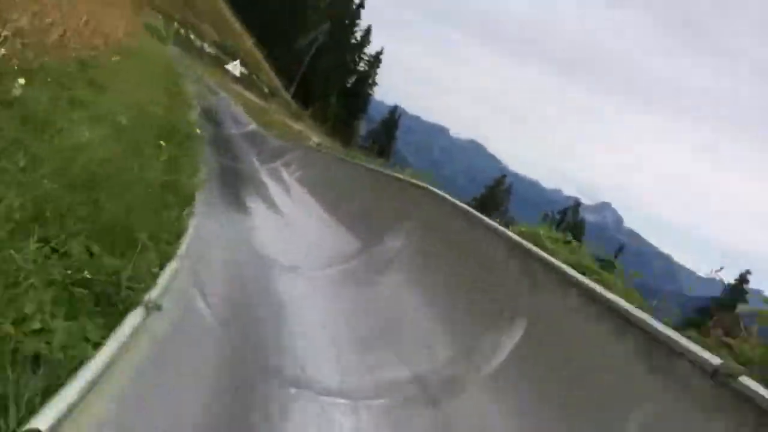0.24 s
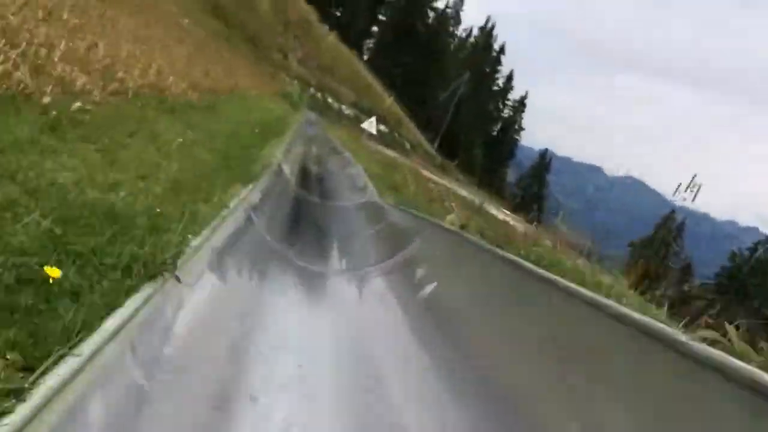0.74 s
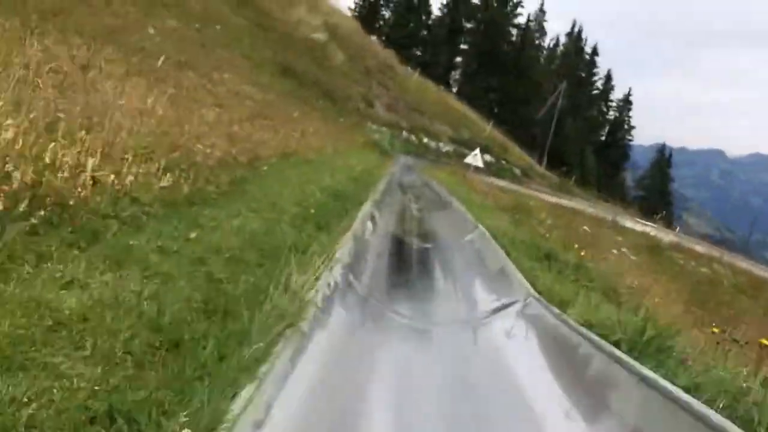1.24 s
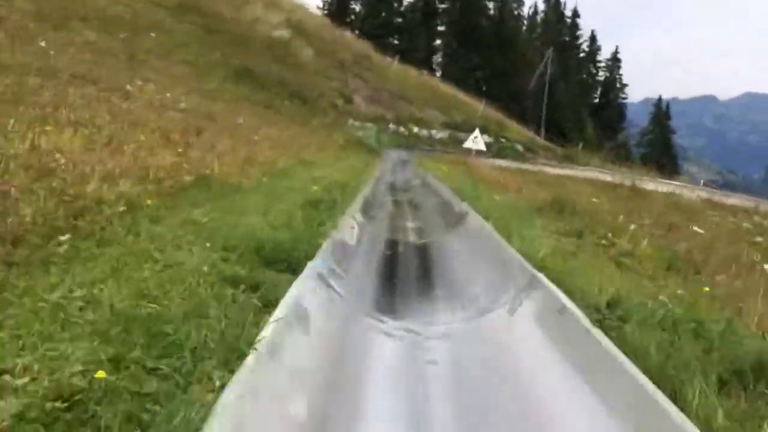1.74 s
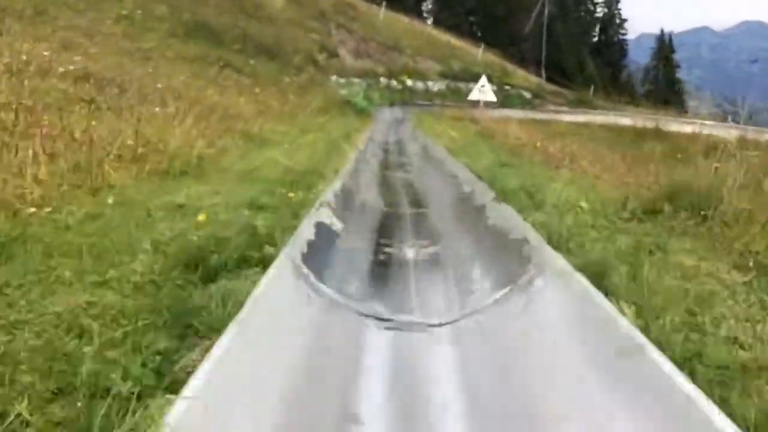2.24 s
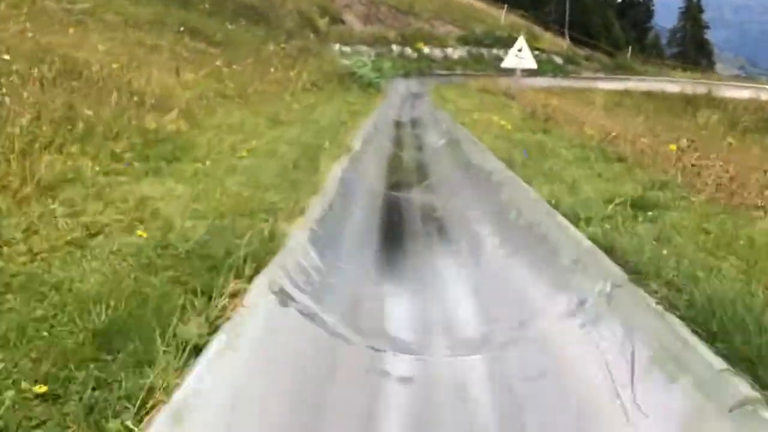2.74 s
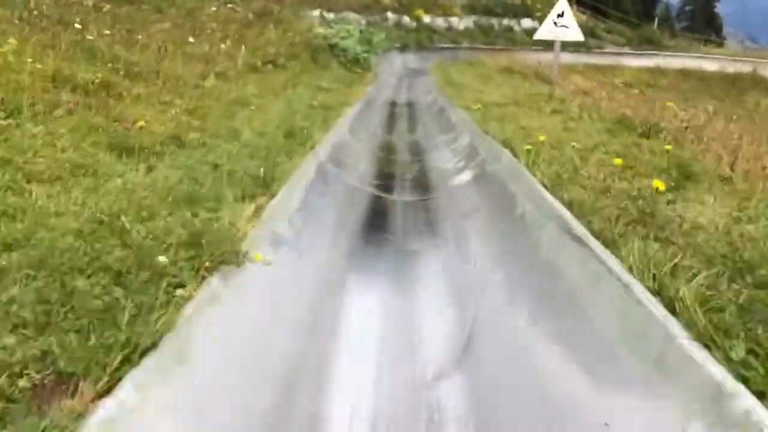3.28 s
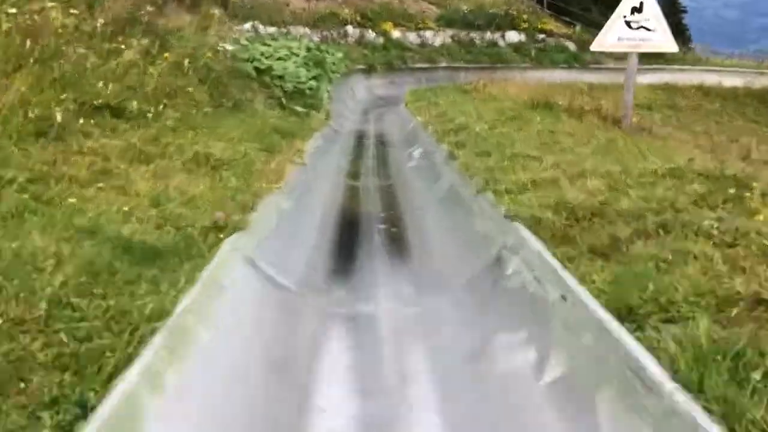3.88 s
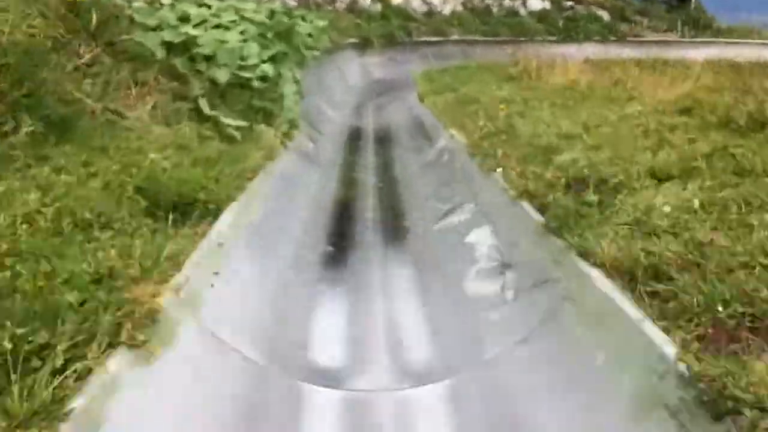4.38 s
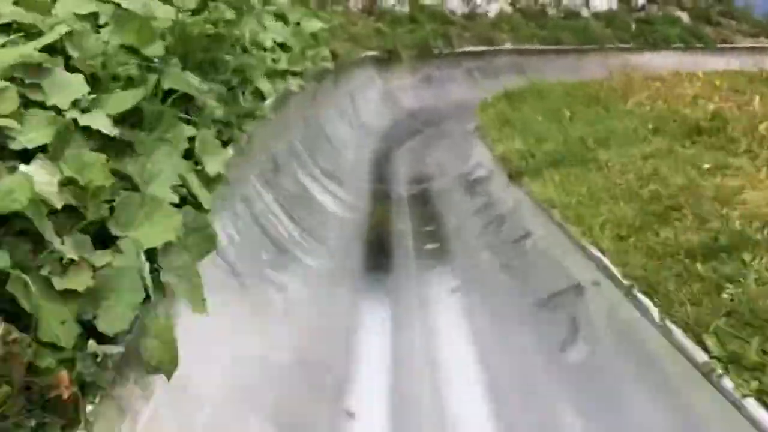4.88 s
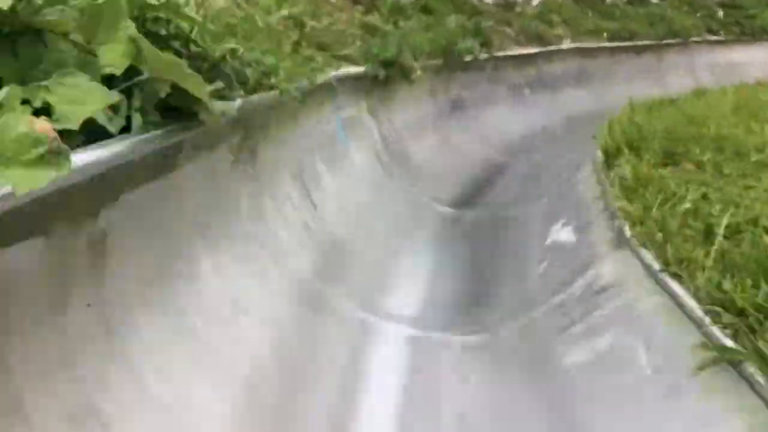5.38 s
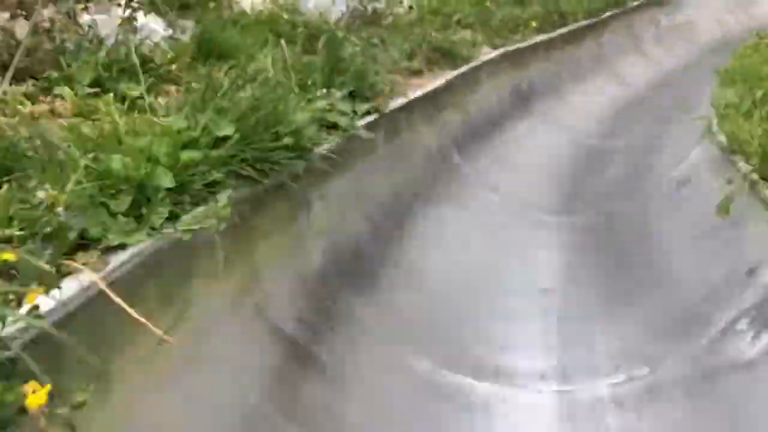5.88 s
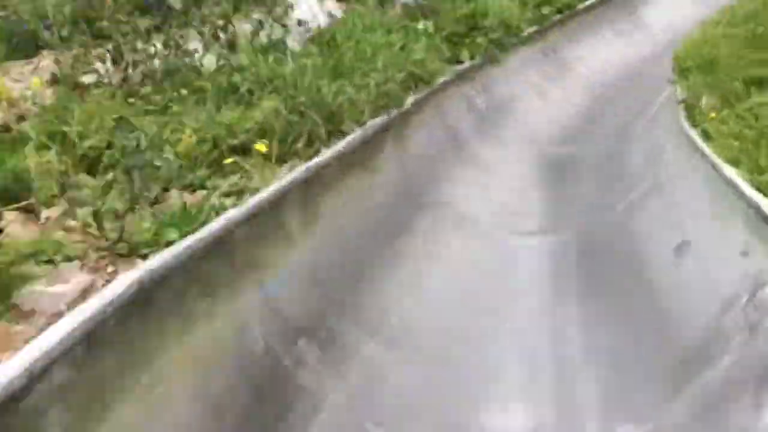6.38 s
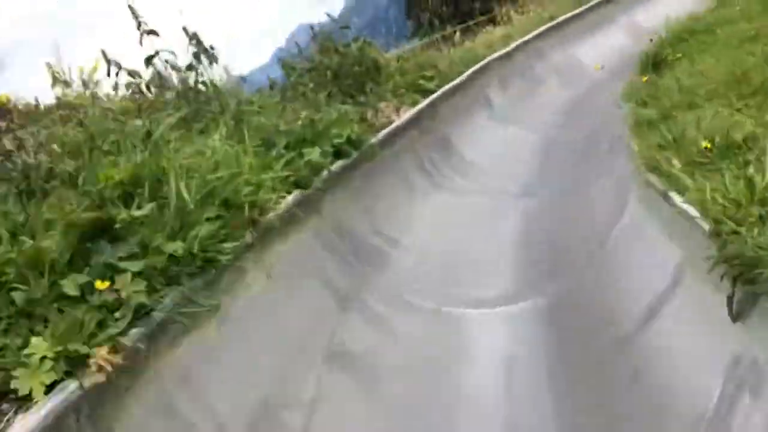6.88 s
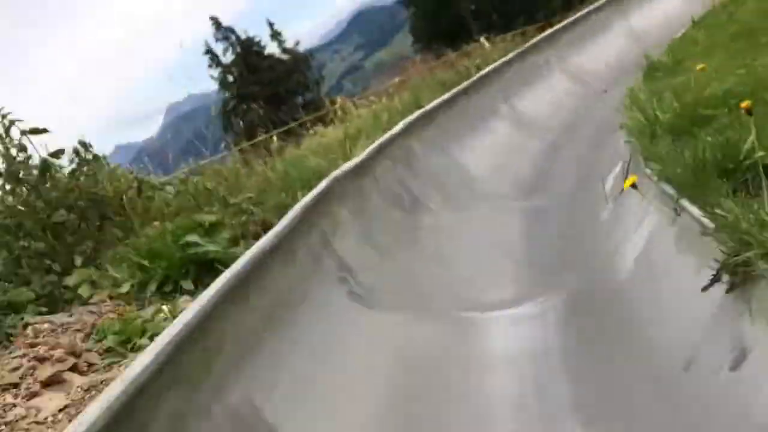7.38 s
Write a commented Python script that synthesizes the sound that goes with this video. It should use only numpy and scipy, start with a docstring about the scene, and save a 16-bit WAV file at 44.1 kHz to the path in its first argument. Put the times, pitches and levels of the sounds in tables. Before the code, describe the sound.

A plastic sled runs down a sheet-metal trough on a grassy hillside, heard from on board, with a continuous low roar, fine grinding and trembling rumble beneath. In the first second, quick hollow booms, clacks, light scuffs and a few metallic clonks tumble together. From about 1 to 2.2 seconds the knocks are sparser, with a pair of strong booms near 1.4. At 2.3 a hard double blow starts the roughest stretch: deep thuds, booming shell, clattering hits and gritty skids crowd together until about 4.5, with short whirrs rising near 2.5, 3.3, 3.7 and 4.2. Heavy thumps continue around 4.7 and 4.8, then thin out. After roughly 5.4 the runners hiss more strongly through a bend, with isolated knocks near 5.9, 6.1 and 6.7, and a lighter cluster around 7.4. The sliding continues to the end.

```python
"""A plastic sled runs fast down a sheet-metal trough on a hillside, heard from on board.
Each jolt makes the sled's shell boom and the trough thud and sag, with a clack; some blows clonk.
These are ringing tones and bursts of tiny contacts. Runners scuff the metal, and whirrs rise after hard scuffs.
Underneath, filtered noise and grit make the runners' roar and grind, and a hiss as the sled leans into a bend."""
import sys
import numpy as np
from scipy import signal
from scipy.fft import rfft, irfft
from scipy.io import wavfile

SR = 44100
rng = np.random.default_rng(int(sys.argv[2]) if len(sys.argv) > 2 else 0)


def wav_out(sig):
    """Save sig, one row per channel (or a flat mono array), as 16-bit PCM at SR to the path in sys.argv[1]."""
    wavfile.write(sys.argv[1], SR, np.round(np.clip(np.atleast_2d(sig).T, -1, 1) * 32767).astype(np.int16))


N = 336483  # length in samples


def from_db(db):
    """Turn decibels into a gain."""
    return 10 ** (np.asarray(db) / 20)


def rms_one(x):
    """Scale a sound to an rms (average strength) of 1."""
    return x / np.sqrt(np.mean(x ** 2) + 1e-20)


def level_curve(rows):
    """Draw straight lines between (time, level) points, giving a level for every sample."""
    times, levels = np.transpose(rows)
    return np.interp(np.arange(N) / SR, times, levels)


def add(out, s, sound):
    """Mix a sound in at time s."""
    start = int(np.clip(round(s * SR), 0, N - 1))
    out[start:start + len(sound)] += sound[:N - start]


def drift(rate_hz):
    """Wander slowly at random around 0, with a spread of 1."""
    # worked out at every 20th sample; the first 4000 values let the filter settle
    r = np.exp(-40 * np.pi * rate_hz / SR)
    noise = rng.standard_normal(N // 20 + 4002)
    slow = signal.lfilter([1], [1, -2 * r, r * r], noise)[4000:]
    return np.interp(np.arange(N) / 20, np.arange(len(slow)), rms_one(slow))


def low_pass(x, hz):
    """Take away the sound above a pitch, gently."""
    return signal.sosfilt(signal.butter(2, hz, "low", fs=SR, output="sos"), x)


def colour(x, spectrum, size=2048):
    """Filter a sound to a spectrum without pre-echo (minimum phase); white noise keeps its power."""
    hz, db = np.transpose(spectrum)
    grid = np.maximum(np.arange(size // 2 + 1) * SR / size, 1)
    gain = from_db(np.interp(np.log(grid), np.log(hz), db))
    cepstrum = irfft(np.log(gain))
    # folding the cepstrum onto positive times puts the energy as early as possible
    folded = 2 * cepstrum[:size // 2] * (np.arange(size // 2) > 0)
    response = irfft(np.exp(rfft(folded, size)))
    return signal.fftconvolve(x, response / np.linalg.norm(response))[:len(x)]


def ring(clicks, hz, t60):
    """A unit click starts a sine of height 1 that falls by 60 dB in t60 seconds."""
    r, w = from_db(-60 / (t60 * SR)), 2 * np.pi * hz / SR
    return signal.lfilter([0, np.sin(w)], [1, -2 * r * np.cos(w), r * r], clicks + 1e-18)


def resonate(x, hz, t60):
    """Ring a mode (one natural tone) with noise-like input, keeping its power."""
    return ring(x, hz, t60) * np.sqrt(2 * (1 - from_db(-120 / (t60 * SR))))


def grains(per_s, spread_db, size=N):
    """Tiny contacts at random moments, uneven in size; rms 1."""
    sizes = from_db(spread_db * np.minimum(rng.exponential(1, size), 4))
    sizes = sizes * rng.choice([-1, 1], size)
    return rms_one(sizes * (rng.random(size) < per_s / SR))


def burst(rise_s, length_s):
    """The pressure of a contact: a quick rise, a short hold, then it lets go; top 1."""
    t = np.arange(SR // 3) / SR
    shape = (1 - np.exp(-t / rise_s)) * from_db(-20 * (t / length_s) ** 1.4)
    return shape / shape.max()


def chatter(envelope, per_s, spread_db):
    """A run of tiny contacts under an envelope, with the envelope's energy."""
    force = envelope * grains(per_s, spread_db, size=len(envelope))
    return force * np.linalg.norm(envelope) / (np.linalg.norm(force) + 1e-12)


def at_spot(spectrum, ripple_db, tilt_db=0, count=110):
    """Each spot of the track adds narrow peaks and dips of its own to the common spectrum."""
    hz, db = np.transpose(spectrum)
    octave = np.linspace(np.log2(hz[0]), np.log2(hz[-1]), count)
    level = np.interp(octave, np.log2(hz), db) + tilt_db * octave
    return np.transpose([2 ** octave, level + ripple_db * rng.standard_normal(count)])


def knocks(table, modes, swell_s, soft_s, overtone_db):
    """Each blow feeds a panel's modes, which swell for a few cycles and die away."""
    out, t = np.zeros(N), np.arange(SR // 5) / SR
    ratio, mode_db, life = np.transpose(modes)[:, :, None]
    age = t / (swell_s * life)
    soft_start = 1 - np.exp(-(t / soft_s) ** 2)
    envelope = age * np.exp(1 - age) * soft_start
    chance = rng.standard_normal((len(table), 3, len(modes), 1))
    # only the modes after the first vary in strength and tuning
    side_mode = np.arange(len(modes))[:, None] > 0
    for (s, db, hz), (strength, detune, phase) in zip(table, chance):
        gain = from_db(mode_db + side_mode * (overtone_db + 2.0 * strength))
        pitch = hz * ratio * (1 + 0.037 * detune * side_mode)
        tones = np.sin(2 * np.pi * pitch * t + np.pi * phase)
        add(out, s, from_db(db) * np.sum(gain * envelope * tones, axis=0))
    return out


def shaking(blows, t60):
    """How hard the sled still trembles after its blows: their power, dying away."""
    r = from_db(-120 / (t60 * SR))
    return np.sqrt(signal.lfilter([1 - r], [1, -r], blows ** 2 + 1e-18))


# how bumpy the track is, as a level before the mix: (time [s], level [dB])
BUMPINESS = [(0, -19), (.08, -42.5), (.25, -32.5), (.9, -32.5), (1.3, -49.5), (1.6, -40.5), (2.2, -37),
             (2.4, -34.5), (3.05, -37.5), (3.3, -29.5), (4.3, -33.5), (4.57, -35), (6.05, -38.5),
             (6.35, -32.5), (6.53, -37.5), (6.88, -31), (7.0, -41.5), (7.1, -30), (7.47, -38.5),
             (7.63, -30)]


def trembling(blows, load):
    """Bumps shake the shell, and every blow leaves it trembling for a moment."""
    from_bumps = from_db(level_curve(BUMPINESS) + 2.5 + 0.23 * load)
    return np.hypot(from_bumps, from_db(-7.0) * shaking(blows, t60=0.17))


# the natural tones of the shell: (pitch [Hz], relative level [dB], time to fall by 60 dB [s])
SHELL_TONES = [(161, -8, 0.053), (250.6, -2, 0.12), (281.6, 4, 0.1), (326.7, -2.5, 0.071),
               (382.4, -4, 0.14), (465, -10, 0.071), (596, -17.5, 0.045)]


def rumble():
    """Small bumps strike all the shell's modes, each with a strength of its own; rms 1."""
    bumps = grains(per_s=65, spread_db=0.5)
    tones = np.zeros(N)
    for hz, db, t60 in SHELL_TONES:
        tones += from_db(db) * resonate(bumps * rng.standard_normal(N), hz, t60)
    return rms_one(tones)


# the tone colour of the low roar: (frequency [Hz], relative level [dB])
ROAR_COLOUR = [(22, -19), (55, 2), (105, 5), (160, -1.5), (230, -8), (400, -12), (1200, -60)]


def roar(grind_db, load):
    """The trough's low roar is deep noise that grows with the grinding and the load."""
    level_db = -35.0 + 0.38 * (grind_db + 51.0) + 0.79 * load + 2.0 * drift(9.1)
    return from_db(level_db) * colour(rng.standard_normal(N), ROAR_COLOUR, size=8192)


# the tone colour of the sled hitting metal, hopping or clacking: (frequency [Hz], relative level [dB])
CLACK_COLOUR = [(120, -33.5), (250, 5), (450, 18.5), (700, 11.5), (1000, 5.5), (1400, -1.5), (1900, -5),
                (2600, -16.5), (4000, -14), (8000, -20.5), (15000, -36.5)]


def ticks(tremble):
    """Small, soft hops on the metal, stronger while the shell trembles."""
    hops = low_pass(grains(per_s=90, spread_db=-1), 2500)
    return from_db(-14) * tremble * colour(hops, CLACK_COLOUR)


# how hard the runners grind on the sheets, before the mix: (time [s], level [dB])
GRIND_LEVEL = [(0, -46.5), (.7, -52.5), (1.05, -51), (1.7, -51), (1.87, -48), (2.2, -47.5), (2.55, -41.5),
               (2.7, -50), (3.25, -52), (3.34, -48), (3.48, -41), (3.62, -47.5), (3.82, -33.5), (4.0, -49),
               (4.26, -33), (4.4, -50), (5.14, -51.5), (5.22, -46), (5.42, -44.5), (5.8, -50), (5.88, -45),
               (6.02, -48), (6.3, -51.5), (6.4, -45), (6.56, -50), (6.8, -48), (7.0, -48.5), (7.1, -45.5),
               (7.22, -51), (7.63, -47.5)]


def grinding_level(scrape):
    """The runners grind harder on rough track and for a moment after a scuff."""
    drag = from_db(-5.5) * shaking(scrape, t60=0.14)
    track = from_db(level_curve(GRIND_LEVEL) - 1)
    return 10 * np.log10(track ** 2 + drag ** 2)


# the ringing of the trough's sheets: (pitch [Hz], relative level [dB], time to fall by 60 dB [s])
SHEET_TONES = [(586, -3, 0.014), (1605, 13, 0.011), (1782, 9.5, 0.027), (1850, -3, 0.13),
               (2050, 9.5, 0.032)]
# the tone colour of the grit itself: (frequency [Hz], relative level [dB])
GRIT_COLOUR = [(300, -9), (550, 4), (900, 17), (1250, 6.5), (1800, 7), (2500, -3.5), (3500, 10),
               (15000, -68)]
# the tone colour of the bright rasp: (frequency [Hz], relative level [dB])
RASP_COLOUR = [(1200, -8), (1900, 8), (3100, 7), (3500, -2), (4250, 5), (5500, 0), (15000, -10)]


def grinding(level_db):
    """Grit under the runners rings the sheets, whose tones come and go; harder grinding rasps more."""
    grit = grains(per_s=1900, spread_db=-2.0) * from_db(2.0 * drift(25))  # in coarse clumps
    tones = np.zeros(N)
    for hz, db, t60 in SHEET_TONES:
        tones += from_db(db + 3 * drift(12)) * resonate(grit, hz, t60)
    body = from_db(-2.0) * rms_one(low_pass(tones, 2600))
    body += from_db(-9.0) * colour(grit, GRIT_COLOUR)
    rasp_gain = from_db(-2.0 + 0.15 * (level_db + 24.5))
    rasp = rasp_gain * colour(grains(per_s=2200, spread_db=3.0), RASP_COLOUR)
    return from_db(level_db) * (body + rasp)


# smooth sliding, with a brief swell at 3.85 s and a long strong stretch in the last bend:
# (time [s], level [dB])
SLIDE_LEVEL = [(0, -57), (.5, -48), (1.0, -56.5), (1.25, -53.5), (1.7, -54), (1.86, -49.5), (2.3, -57.5),
               (2.66, -55), (3.64, -58.5), (3.85, -43.5), (4.4, -59), (4.97, -59.5), (5.42, -45.5),
               (5.74, -52), (5.88, -44), (6.0, -45.5), (7.0, -45.5), (7.63, -48)]
# the tone colour of the hiss: (frequency [Hz], relative level [dB])
HISS_COLOUR = [(1200, 5), (2500, 3.5), (4200, 3), (5200, 4), (6400, 8.5), (8000, 6), (11000, 3), (15500, 0)]


def hiss(load):
    """Smoothly sliding runners hiss with a dense stream of tiny contacts."""
    contacts = grains(per_s=25000, spread_db=3.5)
    return from_db(level_curve(SLIDE_LEVEL) + load) * colour(contacts, HISS_COLOUR)


# a runner scuffs the metal, from a short tick to a long skid, before the mix:
# (time [s], level [dB], time for its pressure to fall about 20 dB [s], brightness [dB per octave])
SCUFF_EVENTS = [(.019, -37, 0.0064, 6), (.185, -35, 0.02, 4), (.225, -41.5, 0.04, -2),
                (.264, -38.5, .018, 5), (.323, -38, 0.014, 7), (.41, -35, 0.016, 3), (.487, -39, .014, 5),
                (.545, -41, .02, 2.5), (.666, -44, 0.046, 1), (.701, -26.5, 0.009, -9),
                (.733, -40, 0.015, 6), (.819, -35.5, 0.014, -1), (.917, -38.5, 0.023, 7),
                (1.453, -35.5, .028, 4), (2.307, -24, 0.014, 4), (2.328, -29.5, .035, 3),
                (2.384, -40.5, 0.049, 4.5), (2.454, -27, 0.0054, 0.5), (2.501, -32.5, 0.041, 2.5),
                (2.59, -35, 0.026, -4.5), (2.703, -34.5, 0.087, 3), (2.826, -41.5, 0.019, 0),
                (2.847, -31.5, 0.016, -1), (2.893, -36.5, 0.048, -1.5), (3.01, -45, .014, 2),
                (3.122, -31.5, .04, -3.5), (3.191, -39.5, 0.014, 0.5), (3.245, -36.5, 0.065, -5.5),
                (3.283, -35.5, 0.028, 4), (3.306, -25, 0.032, 4), (3.406, -33.5, 0.04, -4),
                (3.524, -35, 0.036, 2.5), (3.562, -34, 0.022, 3), (3.644, -25.5, 0.016, -11),
                (3.684, -29.5, 0.023, -9), (3.714, -27.5, 0.03, 4.5), (3.781, -39.5, 0.13, 9),
                (3.92, -32, 0.033, 2), (3.957, -35.5, .011, 4), (3.994, -34, 0.01, 3),
                (4.049, -30, 0.02, 0.5), (4.092, -25, 0.027, 5), (4.175, -27, 0.017, -0.5),
                (4.227, -39, .11, 3), (4.272, -31.5, 0.018, -3.5), (4.313, -32, 0.023, 4.5),
                (4.377, -42.5, .014, 1), (4.529, -41, 0.011, -9), (4.632, -33.5, 0.032, 1),
                (4.703, -38, 0.006, 9), (4.8, -49, 0.008, 7), (5.056, -45, 0.015, -1),
                (5.175, -37.5, .0076, 0.5), (5.528, -33.5, 0.01, 0), (5.895, -37, 0.019, -5),
                (6.117, -28, 0.022, -6), (6.353, -35, 0.027, -5), (6.433, -40, 0.011, -3),
                (7.148, -36, 0.041, 0.5), (7.377, -33.5, 0.022, 2.5), (7.54, -34.5, 0.014, -5.5),
                (7.619, -33.5, .013, 3)]
# the tone colour of a scuff: (frequency [Hz], relative level [dB])
SCUFF_COLOUR = [(700, -0.5), (1600, 9), (2600, 4.5), (4300, 8), (5500, 5.5), (6300, 6.5), (7500, 2),
                (9400, 3.5), (12000, -4.5), (15500, -8)]


def scuffs(hits):
    """A runner slaps the metal and skids on, gritty and uneven; every landing skids a little too."""
    # a landing's skid is 10 dB under its clack, 0.017 s long and dull (-6 dB per octave)
    skids = [(s, db - 10, 0.017, -6) for s, db in hits]
    out = np.zeros(N)
    for s, db, length_s, tilt_db in list(SCUFF_EVENTS) + skids:
        pressure = burst(rise_s=0.0014, length_s=length_s)
        force = from_db(db) * chatter(pressure, per_s=5000, spread_db=2.5)
        add(out, s, colour(force, at_spot(SCUFF_COLOUR, ripple_db=4.0, tilt_db=tilt_db)))
    stick_and_slip = from_db(2.2 * drift(145))
    return from_db(3.0) * out * stick_and_slip


# the sled hits a seam or dent, levels before the mix: (time [s], boom of the shell [dB],
# pitch of the boom [Hz], thud of the trough [dB], clack [dB])
JOLT_EVENTS = [(0.114, -20.5, 295, -14, -32.5), (.160, -10.5, 278.5, -22, -34), (.192, -15, 287, -28, -26),
               (0.208, -13.5, 289, -26, -40), (.349, -19, 309, -23, -33), (0.413, -17.5, 325, -24, -34),
               (0.464, -20, 305, -39, -34.5), (.588, -13.5, 292, -34, -31.5), (.826, -17.5, 287, -39, -29),
               (.866, -12, 292, -36, -33), (0.93, -22, 320, -16, -25.5), (1.057, -21.5, 318, -11.5, -32),
               (1.14, -27, 274, -12, -57), (1.224, -41, 295, -14, -50), (1.425, -13, 294, -18, -36),
               (1.446, -8.5, 287.7, -32, -33.5), (1.572, -26, 295, -16.5, -41.5),
               (1.858, -11.5, 285, -11, -36.5), (2.008, -24, 288, -20.5, -36),
               (2.284, -7.5, 275, -3.5, -27), (2.305, -12, 283.6, -15, -41), (2.323, -6.5, 293, -27, -33),
               (2.435, -15, 298, -10, -25.5), (2.456, -12, 300, -3, -23.5), (2.592, -24.5, 300, -14.5, -36),
               (2.712, -8, 329, -9, -28), (2.747, -15.5, 321, -17, -43), (2.848, -12, 319, -5, -25.5),
               (2.891, -20, 297, -9.5, -31.5), (2.997, -29, 297, -30, -35), (3.104, -10.5, 305, -6, -34),
               (3.122, -10.5, 337, -12, -25), (3.186, -19.5, 283, -21, -46), (3.264, -12, 305, -4.5, -24.5),
               (3.312, -13, 305, -17, -29), (3.505, -8.5, 309.4, -4.5, -34), (3.548, -14.5, 342, -7, -25.5),
               (3.644, -28, 298, -4, -23.5), (3.667, -20, 384, -15, -29.5), (3.715, -23, 300, -6.5, -28),
               (3.786, -21, 314, -8.5, -35), (3.907, -9.5, 326, -9.5, -30), (3.944, -17.5, 310, -7, -46),
               (4.035, -10, 307, -7.5, -25), (4.061, -10.5, 353, -5, -24), (4.097, -13.5, 352, -6.5, -30),
               (4.18, -16.5, 310, -8, -33), (4.296, -9, 356.3, -6, -28), (4.423, -16.5, 282, -5.5, -23.5),
               (4.46, -29, 294, -6.5, -38), (4.667, -7, 276.4, -4, -30.5), (4.707, -30, 288, -24, -35.5),
               (4.8, -20, 294, -3.5, -30), (4.854, -15, 294, -12, -37.5), (5.045, -20, 274, -10, -41),
               (5.515, -17, 321, -3, -35), (5.651, -23.5, 323.5, -9, -32), (5.874, -23, 316, -9.5, -35),
               (6.122, -11.5, 292, -43, -27.5), (6.443, -19, 291.5, -33, -38.5),
               (6.666, -14.5, 335.5, -17.5, -27), (6.902, -22.5, 299, -15.5, -32.5),
               (7.173, -17, 305, -30, -52), (7.308, -25, 298, -25, -35.5),
               (7.378, -16.5, 361, -15.5, -25.5), (7.403, -12.5, 292.4, -28, -35),
               (7.601, -18.5, 304, -17.5, -40.5)]
# the sheet under the sled, stiffer and slacker along the track: (time [s], pitch [Hz])
SHEET_PITCH_CURVE = [(.9, 151), (1.2, 124), (2.3, 173.4), (2.85, 146.4), (3.7, 142), (4.06, 162),
                     (4.42, 115.4), (5.05, 115.8), (5.5, 132.7), (7.6, 135.4)]
THUD_LEAD_S, BOOM_LAG_S = 0.00607, 0.00082  # the sheet gives way just before the hit, the shell answers after
THUD_SPREAD_OCTAVES = 0.024  # every spot of the track is tuned a little differently


def landings():
    """Split each jolt into a thud and a boom (time, level, pitch) and a clack (time, level)."""
    booms, thuds, hits = [], [], []
    spots = rng.standard_normal(len(JOLT_EVENTS))
    for (s, boom_db, boom_hz, thud_db, clack_db), spot in zip(JOLT_EVENTS, spots):
        sheet_hz = np.interp(s, *np.transpose(SHEET_PITCH_CURVE))
        booms.append((s + BOOM_LAG_S, boom_db, boom_hz))
        thuds.append((s - THUD_LEAD_S, thud_db, sheet_hz * 2 ** (THUD_SPREAD_OCTAVES * spot)))
        hits.append((s, clack_db))
    return booms, thuds, hits


# the natural tones of a knocked panel, sheet or shell:
# (multiple of its pitch, relative level [dB], life as a multiple of the swell time)
PANEL_TONES = [(1, 2, 0.61), (.74, -21, 2.74), (1.27, -16, 2.03), (1.58, -16.5, 0.77), (2.05, -32.5, 3.1)]


def sheet_thuds(thuds):
    """The struck metal sheet thuds: low tones with a sharp start and strong overtones."""
    return from_db(-6.5) * knocks(thuds, PANEL_TONES, swell_s=0.0086, soft_s=0.00043, overtone_db=9.0)


def sags(thuds):
    """The trough sags under each landing with a deep, short thump; a slack sheet gives more."""
    slack_hz, loss_per_octave = 113, 29  # reference pitch; dB lost per octave on stiffer sheets
    pushes = np.zeros(N)
    for s, db, hz in thuds:
        add(pushes, s, from_db([db - 6.5 + loss_per_octave * np.log2(slack_hz / hz)]))
    return ring(pushes, hz=73, t60=0.075)


def clacks(hits):
    """The sled lands on metal with one firm hit and chatters for an instant; heavier is duller."""
    out = np.zeros(N)
    for s, db in hits:
        pressure = burst(rise_s=0.00073, length_s=0.045)
        force = from_db(db) * chatter(pressure, per_s=2200, spread_db=0.5)
        firm_hit = signal.unit_impulse(len(force), int(0.00205 * SR))
        force = force + from_db(-10.5) * np.linalg.norm(force) * firm_hit
        tilt_db = 2.63 - 0.077 * (db + 32.5)  # brightness, dB per octave
        add(out, s, from_db(1.5) * colour(force, at_spot(CLACK_COLOUR, ripple_db=2.5, tilt_db=tilt_db)))
    return out


# a square blow makes a sheet of the trough clonk: (time [s], level [dB], pitch [Hz])
CLONK_EVENTS = [(.114, -19.5, 558), (.349, -19, 506), (.585, -22, 516), (.700, -21.5, 580),
                (.816, -17.5, 506), (.932, -30, 606), (1.055, -23, 682), (2.847, -29, 520),
                (4.053, -23, 553), (6.121, -28, 867), (6.667, -20, 490), (7.047, -29.5, 513)]
# the natural tones of a clonk:
# (multiple of its pitch, relative level [dB], life as a multiple of the swell time)
CLONK_TONES = [(1, 0.5, 0.81), (1.3, -3, 0.68), (1.7, -5.5, 0.75), (2.1, -8.5, 0.71), (2.9, -15, 1)]


def clonks():
    """A squarely struck sheet rings with a few short tones."""
    return knocks(CLONK_EVENTS, CLONK_TONES, swell_s=0.0047, soft_s=0.002, overtone_db=1)


def shell_booms(booms):
    """The plastic shell booms: its tones start softly, swell and die away."""
    return from_db(0.5) * knocks(booms, PANEL_TONES, swell_s=0.0086, soft_s=0.0029, overtone_db=0.5)


def trough(x, t60):
    """The metal sheets carry each contact on in a dense, dull ring."""
    t = np.arange(SR // 2) / SR
    tail = rng.standard_normal(len(t)) * from_db(-60 * t / t60) * (t > .008)
    band = signal.butter(2, [450, 2300], "band", fs=SR, output="sos")
    return signal.sosfilt(band, signal.fftconvolve(x, tail / np.linalg.norm(tail))[:N])


# a whirr rises after a hard scuff, like a small wheel spinning up:
# (time [s], level [dB], time for it to fall about 20 dB [s])
WHIRR_EVENTS = [(2.504, -40, 0.15), (3.314, -36, 0.13), (3.717, -34, 0.17), (4.179, -38, 0.11)]
# the bands of a whirr: (multiple of its pitch, relative level [dB], width [Hz])
WHIRR_TONES = [(0.997, 3, 364), (1.652, -6, 600)]


def whirrs():
    """Narrow, rough bands of noise glide up together and fade."""
    start_hz, top_hz, spin_up_s = 1404, 2044, 0.079
    out = np.zeros(N)
    for s, db, length_s in WHIRR_EVENTS:
        envelope = burst(rise_s=0.009, length_s=length_s)
        t = np.arange(len(envelope)) / SR
        pitch = top_hz + (start_hz - top_hz) * np.exp(-t / spin_up_s)
        turn = 2 * np.pi * np.cumsum(pitch) / SR
        for multiple, band_db, width_hz in WHIRR_TONES:
            # slow noise on a sine and a cosine makes a band of noise around the pitch
            a, b = low_pass(rng.standard_normal((2, len(t))), width_hz / 2)
            band = rms_one(a * np.cos(multiple * turn) + b * np.sin(multiple * turn))
            add(out, s, from_db(db + band_db) * envelope * band)
    return out


def scene():
    """Mix the blows with the steady contact of the runners."""
    load = drift(6.4)  # the sled jiggles, pressing harder and softer on the track
    booms, thuds, hits = landings()
    shell = shell_booms(booms)
    sheets = sheet_thuds(thuds)
    scrape = scuffs(hits)
    rattle = clacks(hits) + clonks() + scrape
    blows = shell + sheets + sags(thuds) + rattle + from_db(-11.5) * trough(rattle, t60=0.16)

    grind_db = grinding_level(scrape)
    tremble = trembling(shell + sheets, load)
    steady = tremble * rumble() + roar(grind_db, load) + ticks(tremble)
    steady += grinding(grind_db + 0.5 * load) + hiss(load)
    return (blows + steady + whirrs())[None]


def record(dry):
    """The deepest bass is lost, peaks are rounded, the top is cut."""
    x = signal.sosfilt(signal.butter(3, 36, "high", fs=SR, output="sos"), dry)
    top = 0.96  # peaks bend smoothly towards this height
    x = x / (1 + (x / top) ** 6) ** (1 / 6)
    return signal.sosfilt(signal.ellip(10, .1, 90, 15250, fs=SR, output="sos"), x)


dry = scene()
out = record(dry)
wav_out(out)
```